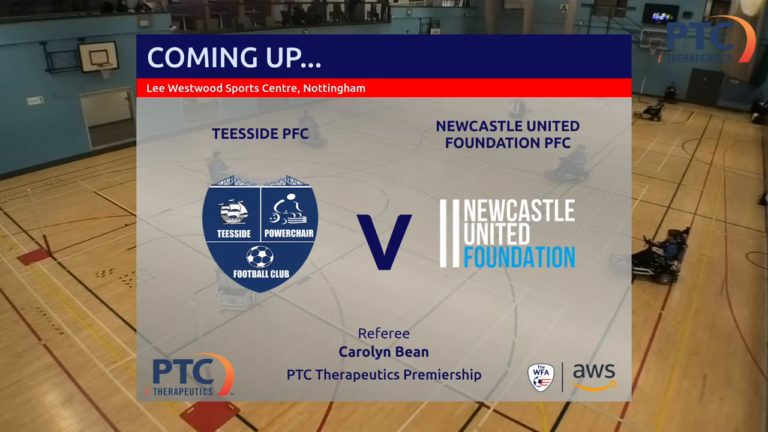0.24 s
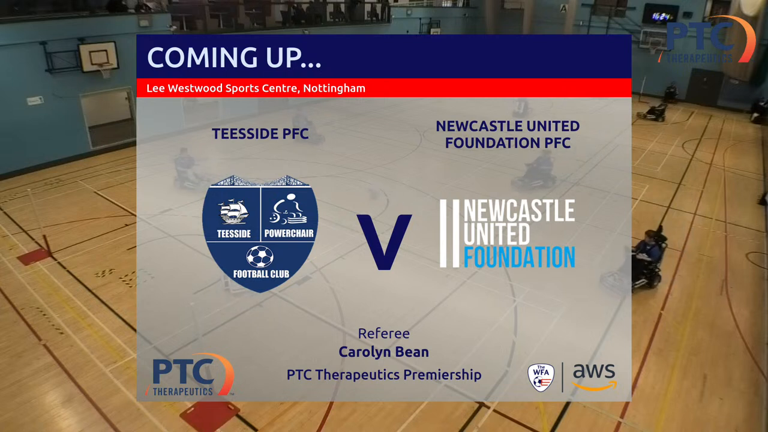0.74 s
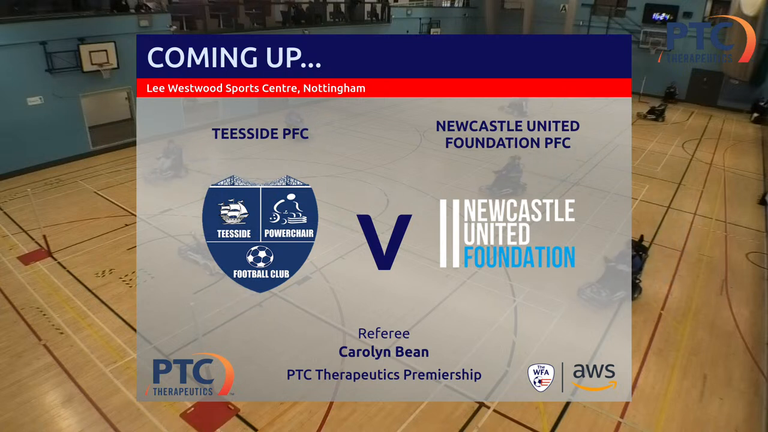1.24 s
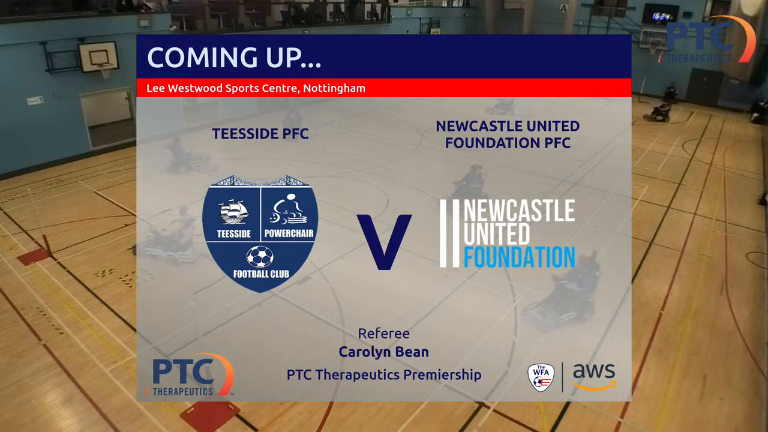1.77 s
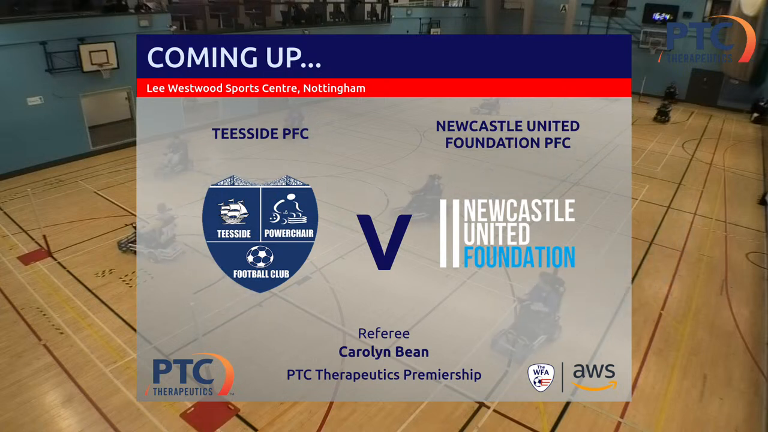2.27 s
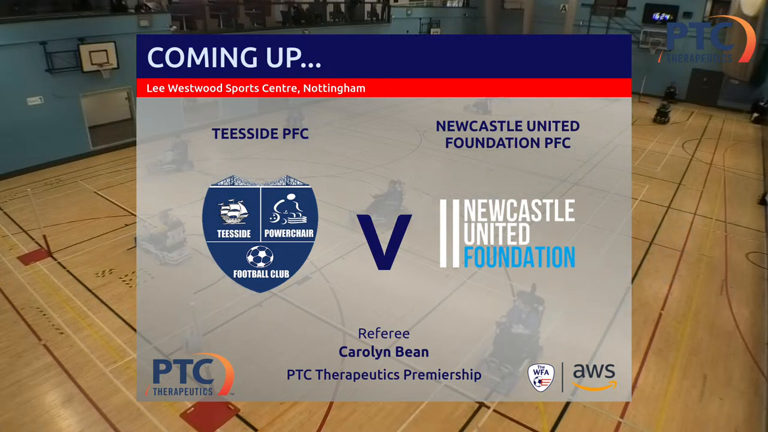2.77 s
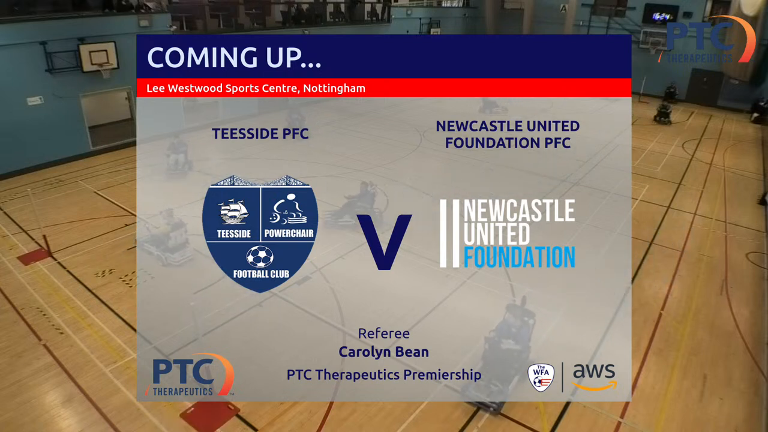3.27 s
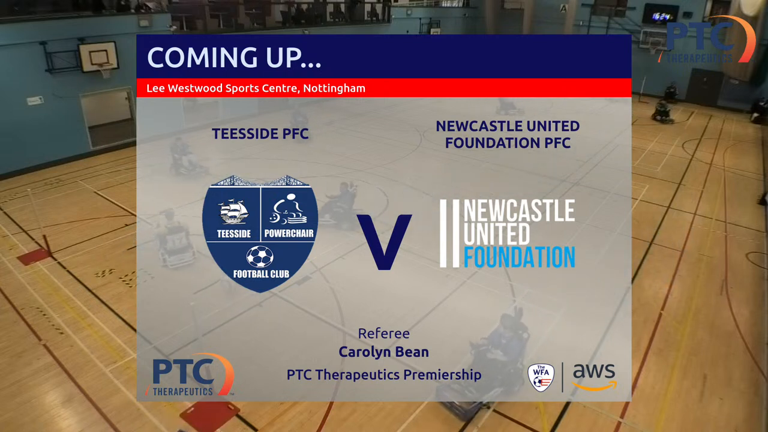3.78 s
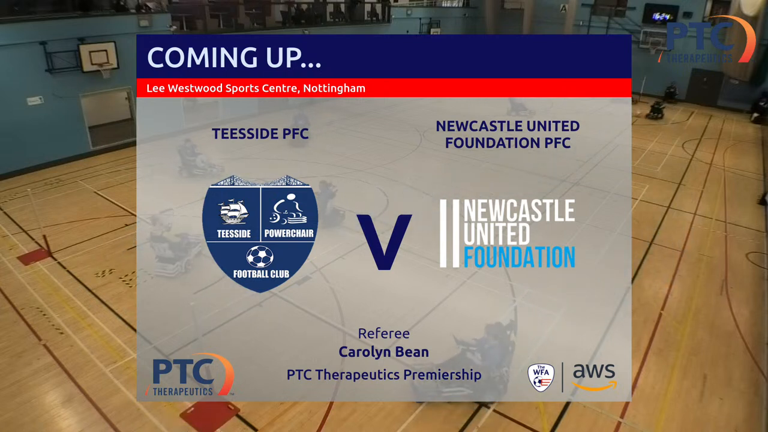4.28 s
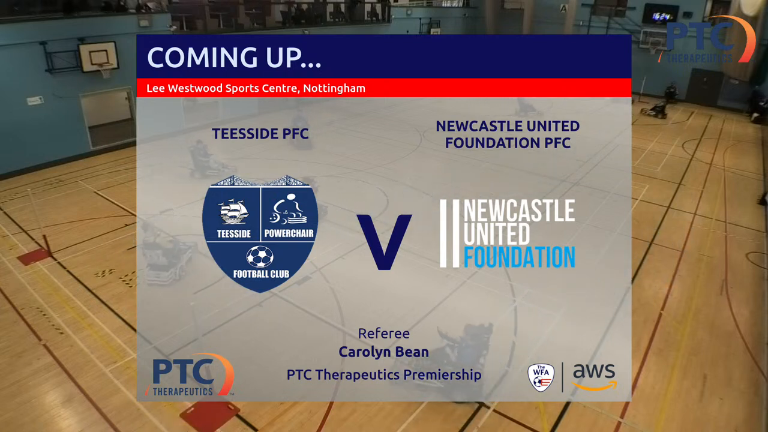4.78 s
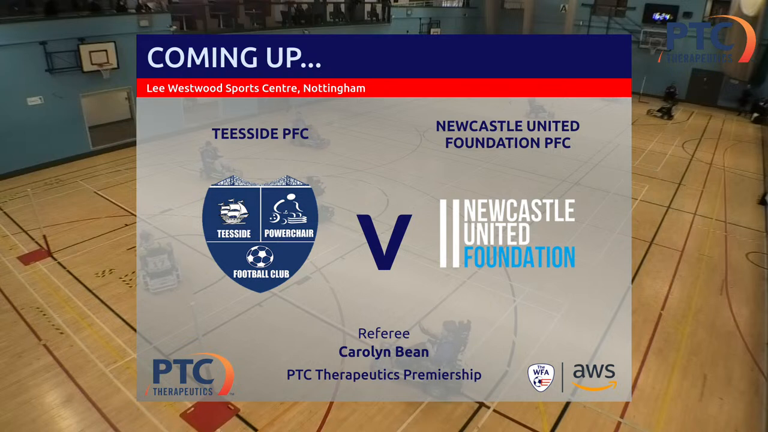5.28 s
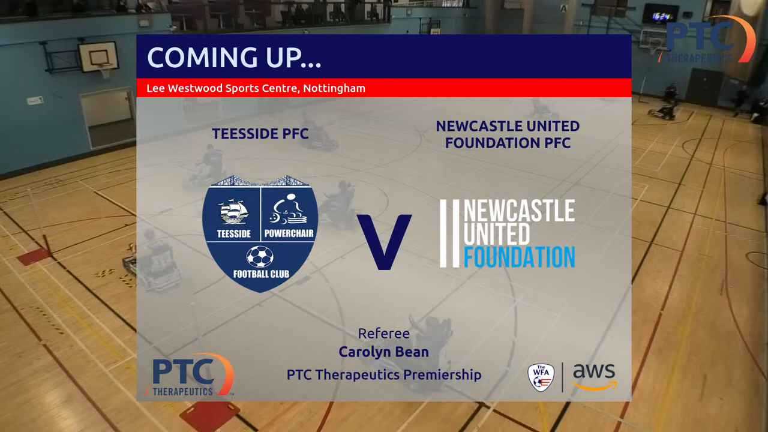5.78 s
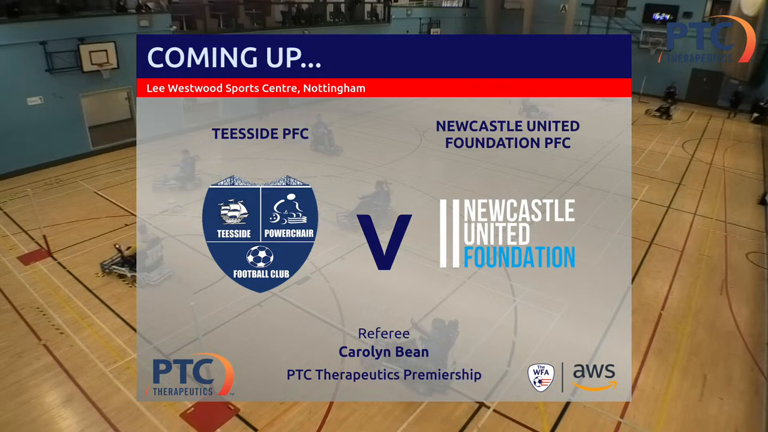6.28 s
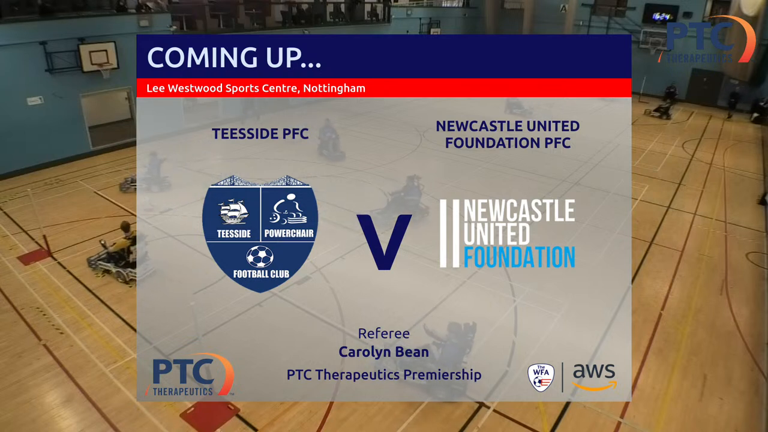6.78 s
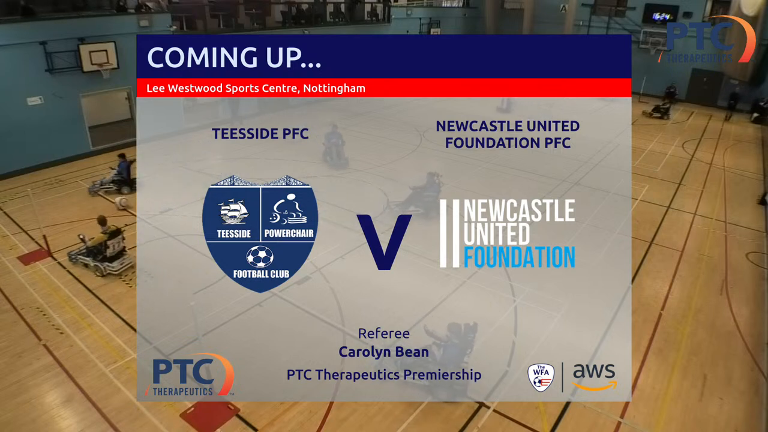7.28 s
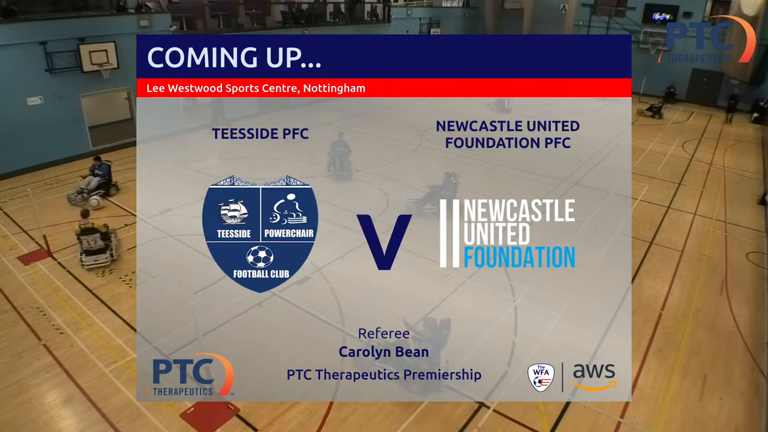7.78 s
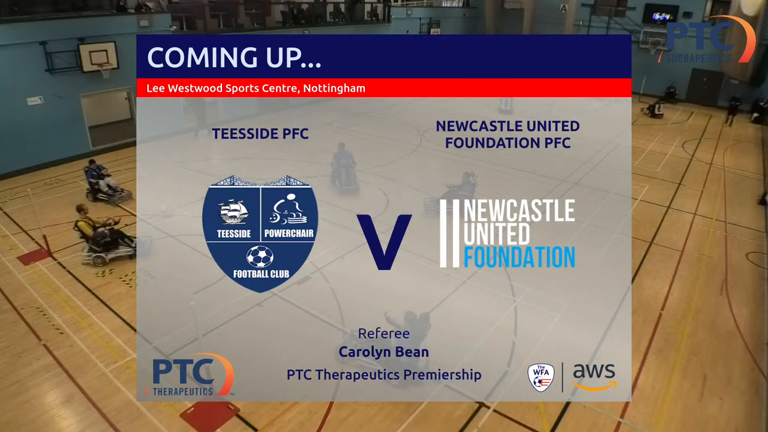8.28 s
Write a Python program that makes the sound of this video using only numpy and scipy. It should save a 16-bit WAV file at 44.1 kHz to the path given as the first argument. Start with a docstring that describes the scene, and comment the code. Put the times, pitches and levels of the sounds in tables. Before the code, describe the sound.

Electrical fault noise straight from the wire, dry and strongly left-sided, with only thin leakage on the right. Quiet open-input hiss gives way to a crackle and a steady, coarse low buzz. Just after one and a half seconds, loud clicks and a rasping high squeal cut it off. The rest is very quiet: hum, breathing hiss, tiny sputters and a wavering treble whine.

```python
"""Loose audio plug on a line input

There is no microphone. The plug's bare tip touches and lets mains buzz, fizz and thin tones into the left wire.
Contact snaps crackle, and the input stage squeals and rasps as the plug seats. Before the touch the open input
gives dull hiss, hum and a whistle; afterwards there is faint hum, hiss, sputters and a high whine that hops in pitch.
The right wire hears the left only by leakage and has its own hum and hiss."""
import sys
import numpy as np
from scipy import signal
from scipy.fft import rfft, irfft, next_fast_len
from scipy.io import wavfile
from scipy.ndimage import uniform_filter1d

SR = 44100
rng = np.random.default_rng(int(sys.argv[2]) if len(sys.argv) > 2 else 0)


def to_wav(s):
    """Save 16-bit WAV."""
    ch = np.atleast_2d(s).T  # columns
    pcm = np.round(np.clip(ch, -1, 1) * 32767)  # PCM
    wavfile.write(sys.argv[1], SR, pcm.astype(np.int16))


def boost(x):
    """Linear amplitude factor 10**(x/20) for a level x in decibels (scalar or array-like)."""
    u = np.asarray(x, float) / 20
    return 10 ** u


N = 376613
T = np.arange(N) / SR
MAINS_HZ = 49.886
OPEN_END_S, SEAT_S = .411, 1.692  # the open input ends, the seated plug begins


def curve(rows):
    """Columns of a (time_s, ..) table drawn as lines through every sample."""
    time_s, *columns = np.transpose(rows)
    return [np.interp(T, time_s, column) for column in columns]


def unit(x):
    """Scales a sound to rms 1."""
    return x / np.sqrt(np.mean(x ** 2))


def noise(points):
    """Noise of rms 1, its spectrum shaped by (pitch_hz, level_db) points on a log frequency axis."""
    pitch_hz, level_db = np.transpose(points)
    size = next_fast_len(N)
    f = np.arange(size // 2 + 1) * SR / size + 1
    gain = boost(np.interp(np.log(f), np.log(pitch_hz), level_db))
    return unit(irfft(rfft(rng.standard_normal(size)) * gain, size)[:N])


def butter(x, hz, kind, order=2):
    """Butterworth filter."""
    sections = signal.butter(order, np.clip(hz, 5, .45 * SR), kind, fs=SR, output="sos")
    return signal.sosfilt(sections, x)


def walk(rate_hz):
    """Smooth random drift of rms 1: noise low-passed at rate_hz."""
    return unit(butter(rng.standard_normal(N), rate_hz, "low"))


def wobbly(hz, spread_hz, rate_hz):
    """A sine of rms 1 whose pitch shivers at random."""
    return np.sqrt(2) * np.sin(2 * np.pi * np.cumsum(hz + spread_hz * walk(rate_hz)) / SR)


def turned(x, radians):
    """The same sound with every frequency turned forward by one phase angle."""
    return np.real(signal.hilbert(x, next_fast_len(N))[:N] * np.exp(1j * radians))


# each pulse edge is followed by a notch in the waveform, which leaves the harmonic levels alone:
# delay, share kept by the edge below and above the knee, knee as a multiple of mains
NOTCH_S, EDGE_SHARE, TREBLE_SHARE, KNEE = .00062, .8, .35, 30


def mains(rows, orders, turn, shift_hz, share=1):
    """Harmonics starting together at a sharp edge (minimum phase); coupling delays and inverts the low ones."""
    multiple, level_db = np.transpose(rows)
    cepstrum = irfft(np.interp(np.arange(1025) / 2, multiple, np.log(boost(level_db))))
    cepstrum[1:1024] *= 2  # fold onto positive time for minimum phase
    cepstrum[1025:] = 0
    edge = np.exp(rfft(cepstrum))[2 * orders]
    s = 1j * orders * MAINS_HZ / shift_hz
    coupling = (s - 1) / (s + 1)
    late = np.exp(-2j * np.pi * orders * MAINS_HZ * NOTCH_S)
    notch = (share + late) / (1 + share * late)
    lines = np.zeros(1025, complex)
    lines[orders] = edge * coupling * notch * 1024
    cycle = irfft(lines)
    return np.interp((T * MAINS_HZ - turn) % 1, np.arange(2048) / 2048, cycle, period=1)


# rectifier current pulses, one of each sign per cycle; levels are peaks at 0 dB coupling
# columns: multiple [odd, of mains], level_db [dB]
PULSE_HARMONICS = [(1, -22.5), (3, -25.9), (5, -29.5), (7, -35.5), (9, -48.0), (11, -40.4), (13, -38.3),
                   (15, -43.7), (17, -36.6), (19, -46.3), (21, -42.9), (23, -43.4), (25, -46.1),
                   (27, -48.8), (29, -61.2), (31, -52.1), (33, -52.2), (35, -54.7), (37, -56.9),
                   (39, -58.1), (41, -57.3), (43, -52.9), (45, -57.0), (47, -60.4)]
# the pulse edges carry the odd series on upward
# columns: multiple [of mains], level_db [dB peak at 0 dB coupling]
EDGE_HARMONICS = [(49, -66), (53, -57), (57, -64), (59, -54), (63, -58), (71, -54), (79, -60), (83, -57),
                  (91, -66), (95, -57), (99, -62), (107, -60), (121, -66)]
# supply ripple
# columns: multiple [even, of mains], level_db [dB peak at 0 dB coupling]
RIPPLE_HARMONICS = [(2, -32), (4, -44), (6, -57), (8, -54), (10, -72), (12, -52), (14, -66), (18, -52),
                    (20, -54), (22, -60), (24, -58), (26, -55), (28, -67), (34, -66), (36, -59), (40, -72),
                    (46, -64), (56, -63), (60, -74)]
EDGE_TURN, RIPPLE_TURN = .165, .34  # where in the mains cycle each starts
EDGE_SHIFT_HZ, RIPPLE_SHIFT_HZ = 60., 130.  # phase turn of the coupling


def buzz():
    """Mains buzz: rectifier pulses of both signs (odd harmonics) plus supply ripple (even harmonics)."""
    odd, even = np.arange(1, 122, 2), np.arange(2, 62, 2)
    share = np.where(odd < KNEE, EDGE_SHARE, TREBLE_SHARE)
    pulses = mains([*PULSE_HARMONICS, *EDGE_HARMONICS], odd, EDGE_TURN, EDGE_SHIFT_HZ, share)
    return pulses + mains(RIPPLE_HARMONICS, even, RIPPLE_TURN, RIPPLE_SHIFT_HZ)


# the bare tip touching, one row per grip
# columns: start_s [s], end_s [s], buzz_db [dB coupling], fizz_db [dB coupling], chatter [0-1 at the start]
GRIP_ROWS = [(.1022, .1095, 8, 2, .3), (.411, .445, -1.5, 0, .75), (.445, .4698, -19, -8, .5),
             (.4698, 1.607, 0, 0, 0), (1.607, 1.618, -2, 0, .4), (1.618, 1.643, -4, -9, .03),
             (1.643, 1.651, -3, 2, .9), (1.651, 1.662, -7, -11, .05), (1.662, 1.676, -5, -2, .4),
             (1.676, 1.688, -11, -5, .4)]
MAKE_S, BREAK_S, CHATTER_S = .00034, .003, .057  # coupling rises fast, lets go slower; chatter calms down


def grip():
    """Coupling gains of buzz and fizz, and the chatter, as the tip makes and loses contact."""
    gain, chatter = np.full((2, N), 1e-3), np.zeros(N)
    for start_s, end_s, buzz_db, fizz_db, shake in GRIP_ROWS:
        letting_go = np.exp(-np.clip(T - end_s, 0, None) / BREAK_S)
        made = np.clip((T - start_s) / MAKE_S, 0, 1) * letting_go
        gain = np.maximum(gain, np.outer([boost(buzz_db), boost(fizz_db)], made))
        after = T >= start_s
        chatter[after] = shake * np.exp(-(T[after] - start_s) / CHATTER_S)
    return gain[0], gain[1], chatter


# noise let in with the buzz
# columns: pitch_hz [Hz], level_db [dB per Hz, relative]
FIZZ_SPECTRUM = [(20, 0), (60, -1), (150, -4), (300, -8), (450, -12), (650, -8), (1000, -11), (1500, -16),
                 (2200, -15), (3200, -17), (5000, -17), (6400, -20), (8600, -19), (11000, -18.5),
                 (14300, -17.5)]
# thin tones while touching, each fading over its last 0.15 s
# columns: start_s [s], end_s [s], pitch_hz [Hz], level_db [dB rms at 0 dB coupling, before flutter]
TOUCH_TONES = [(0.414, 1.0, 11670, -52), (0.42, 1.05, 12000, -47), (0.795, 1.03, 12600, -66),
               (1.28, 1.65, 12300, -57), (1.396, 1.65, 12920, -58.5)]
FIZZ_DB, EDGE_FIZZ_DB = -36.5, -47  # steady fizz rms, gain of the flare at each pulse edge
# on every cycle the treble spits after the second pulse, at a random level:
# middle level, scatter, decay in mains cycles
SPIT_DB, SPIT_SCATTER_DB, SPIT_TURNS = -43, 5, .1


def touch(hum, gain, fizz_gain, chatter):
    """The bare tip lets in buzz, fizz and thin tones; a poor contact shakes the buzz at random."""
    contact = noise([(300, 7.5), (3000, -7.5), (14000, -20.0)])
    edge = np.exp(-((T * MAINS_HZ - EDGE_TURN) % .5) / .031)  # flares twice a cycle
    fizz = boost(FIZZ_DB) * noise(FIZZ_SPECTRUM)
    fizz += boost(EDGE_FIZZ_DB) * edge * butter(rng.standard_normal(N), [1500, 6000], "band")
    turn = T * MAINS_HZ - EDGE_TURN - .5
    cycle_sizes = boost(SPIT_DB + SPIT_SCATTER_DB * rng.standard_normal(N // 800))
    size = cycle_sizes[np.floor(turn).astype(int)]
    spit = np.exp(-(turn % 1) / SPIT_TURNS)
    fizz += size * spit * unit(butter(rng.standard_normal(N), [8000, 11000], "band"))
    tones = np.zeros(N)
    for start_s, end_s, pitch_hz, level_db in TOUCH_TONES:
        sounding = (T > start_s) * np.clip((end_s - T) / .15, 0, 1)
        tones += boost(level_db + 4.6 * walk(25.)) * wobbly(pitch_hz, 12., 40.) * sounding
    shaken = hum * (1 + .6 * chatter * contact)
    return gain * (shaken + .023 * chatter * contact) + fizz_gain * (fizz + tones)


# contact snaps
# columns: start_s [s], level_db [dB peak], low_hz [Hz], high_hz [Hz], spray_s [s decay]
SNAP_ROWS = [(.1059, -10, 3000, 12000, .0003), (.4112, -19, 5500, 11000, .003),
             (.4145, -15, 500, 9000, .002), (.4255, -17, 1000, 10000, .002), (.4345, -21, 1500, 8000, .002),
             (1.24, -28, 6000, 14000, .02), (1.6093, 0, 60, 5500, .0001), (1.614, -24, 1500, 14000, .003),
             (1.6435, -3, 300, 16000, .0002), (1.648, -12, 1000, 16000, .0003),
             (1.663, -12, 500, 14000, .0003), (1.6705, -14, 200, 3000, .0002),
             (2.5422, -33.5, 1500, 16000, .0025), (2.5618, -32, 1500, 16000, .001)]
# faint treble sputters of the seated plug
# columns: start_s [s], level_db [dB peak]
SPUTTER_ROWS = [(3.035, -40), (3.13, -45), (3.39, -45), (3.64, -43), (3.835, -42), (4.87, -45), (5.25, -44),
                (5.87, -45)]
SPUTTER_LOW_HZ, SPUTTER_HIGH_HZ, SPUTTER_S = 10000, 14000, .01


def snaps():
    """Contact sparks: a spike, then a spray of smaller sparks dying away; long sprays bury their spike."""
    out = np.zeros(N)
    rows = list(SNAP_ROWS)
    rows += [(s, db, SPUTTER_LOW_HZ, SPUTTER_HIGH_HZ, SPUTTER_S) for s, db in SPUTTER_ROWS]
    chance = rng.standard_normal((len(rows), 2, 2048))
    since = T[:2048]
    for (start_s, level_db, low_hz, high_hz, spray_s), (sign, size) in zip(rows, chance):
        spray = min(spray_s / .003, 1)
        sparks = spray * sign * boost(2.5 * size) * np.exp(-since / spray_s)
        sparks *= np.minimum(since / (spray * spray_s / 3), 1)
        sparks[0] = 1.2 - spray  # the spike
        sparks = butter(butter(sparks, high_hz, "low"), low_hz, "high")
        i = int(start_s * SR)
        out[i:i + 2048] += boost(level_db) * sparks / np.abs(sparks).max()
    return out


SQUEAL_HZ, RASP_HZ = 9987., 5850.
# it rasps, the tone grows, catches, sags and is cut off as the plug seats
RASP_S, CATCH_S, CUT_S, SILENT_S = 1.6625, 1.672, 1.6908, 1.713
GROW_DB_PER_S, CATCH_DB, HOLD_DB, SAG_S = 3500, -6, -12.5, .003
# rasp levels before its 3 dB trim and flutter
RASP_DB, RASP_CATCH_DB, RASP_CATCH_S, RASP_RISE_S = -17.5, -10, .002, .004
CUT_DB, CUT_DB_PER_S = -36.5, 379  # level and slope from the cut on, before the trims of tone and rasp


def squeal():
    """The input stage oscillates: an unstable tone, and a broken, rasping lower band with a bright spray."""
    since = T - CATCH_S
    cut_db = CUT_DB - CUT_DB_PER_S * (T - CUT_S)
    growing_db = CATCH_DB + GROW_DB_PER_S * since
    sagging_db = HOLD_DB + (CATCH_DB - HOLD_DB) * np.exp(-abs(since) / SAG_S)
    tone_db = np.where(since < 0, growing_db, sagging_db)
    tone_db = np.where(T < CUT_S, tone_db, cut_db - 1)
    rasp_db = RASP_DB + (RASP_CATCH_DB - RASP_DB) * np.exp(-abs(since) / RASP_CATCH_S)
    rasp_db = np.where(T < CUT_S, rasp_db, cut_db)
    tone = wobbly(SQUEAL_HZ, 60., 300.) * boost(1.4 * walk(900.))
    rasp = unit(butter(rng.standard_normal(N), [RASP_HZ - 700, RASP_HZ + 700], "band", order=3))
    spray = noise([(1500, -19), (4000, -11), (7000, -4), (9000, -3.5), (12000, -2), (14300, -8)])
    broken = boost(rasp_db - 3 + 3 * walk(250.)) * np.clip((T - RASP_S) / RASP_RISE_S, .3, 1)
    sounding = (T > RASP_S) * (T < SILENT_S)
    return sounding * np.array([boost(tone_db) * tone, broken * (rasp + 1.2 * spray)])


# resting pitches of the whine's two tones: at rest, spread apart, raised
# columns: upper_hz [Hz], lower_hz [Hz]
WHINE_STATES = [(13320, 13235), (13630, 12170), (13510, 13425)]
# the whine leaves its rest
# columns: start_s [s], end_s [s], state [row of the table above, from 0]
WHINE_HOPS = [(1.69, 2.545, 1), (3.07, 3.128, 1), (3.218, 3.45, 1), (3.45, 3.63, 2), (3.63, 3.687, 1),
              (3.687, 3.73, 2), (3.73, 3.906, 1), (4.395, 4.425, 1), (4.684, 4.749, 1), (4.884, 5.148, 1),
              (5.25, 5.3, 1), (5.83, 5.87, 2)]
# the whine settles after seating
# columns: time_s [s], offset_hz [Hz above the resting pitch]
WHINE_SETTLING = [(1.7, 550), (1.74, 750), (1.8, 600), (1.85, 620), (1.89, 800), (1.95, 250), (2.05, 50),
                  (2.2, 0)]
# the pitch shivers more and sits higher on a stronger line, and shivers most around hops
SHIVER_HZ, SHIVER_DB_PER_DB, HOP_SHIVER_HZ, RESTLESS_S, PITCH_HZ_PER_DB = 32, 2, 22.1, .3, 7.5
BEAT_CARRIERS_HZ = (14825., 15725.)
BEAT_DB, SPREAD_BEAT_DB = -15.5, -3.5  # the beats are fainter while the tones are apart


def whine(line_db):
    """Two shivering tones; the lower one beats against two unheard carriers and leaves faint low tones."""
    state = np.zeros(N, int)
    for start_s, end_s, k in WHINE_HOPS:
        state[(T >= start_s) & (T < end_s)] = k
    span = int(RESTLESS_S * SR)
    hops_near = uniform_filter1d(1. * (np.diff(state, prepend=0) != 0), span) * span
    shiver_hz = SHIVER_HZ * boost(SHIVER_DB_PER_DB * line_db) + HOP_SHIVER_HZ * np.clip(hops_near, 0, 2)
    drift_hz = curve(WHINE_SETTLING)[0] + PITCH_HZ_PER_DB * line_db + shiver_hz * walk(120.)
    upper_hz, lower_hz = np.transpose(WHINE_STATES)[:, state] + drift_hz
    upper = boost(-2. + 2.28 * walk(40.)) * wobbly(upper_hz, 8., 30.)
    lower = boost(-3. + 2. * walk(40.)) * wobbly(lower_hz, 8., 30.)
    beats = sum(wobbly(hz - lower_hz, 6.1, 30.) for hz in BEAT_CARRIERS_HZ)
    beat_db = BEAT_DB + np.where(state == 1, SPREAD_BEAT_DB, 0)
    return upper + lower, boost(beat_db) * beats


# one line level for hum, hiss and whine of the seated plug
# columns: time_s [s], level_db [dB, relative]
SEATED_LEVEL = [(1.72, 2), (1.74, -3), (1.93, 1), (2.0, -4.5), (2.16, -3.5), (2.31, -1.5), (2.8, 0),
                (6.7, -0.5), (6.83, -2.5), (8.54, -3)]


def seated_level():
    """Line level in dB that hum, hiss and whine share once the plug sits."""
    return curve(SEATED_LEVEL)[0]


# hiss of the seated plug
# columns: pitch_hz [Hz], level_db [dB, relative]
HISS_SPECTRUM = [(18, -28.5), (30, 0), (152, -7.5), (197, -10.5), (249, -13), (487, -21.5), (837, -21.5),
                 (1910, -22.5), (7700, -23.5), (13200, -14.5), (14300, -20)]
HUM_DB, HUM_CUT_HZ, HISS_DB = -29, 130, -54  # gains at 0 dB line level


def seated_noise(hum, line_db):
    """Faint hum, the mains buzz thinned by a gentle high-pass, and slowly breathing hiss."""
    faint = boost(line_db + HUM_DB) * butter(hum, HUM_CUT_HZ, "high", order=1)
    hiss = boost(line_db + HISS_DB) * noise(HISS_SPECTRUM) * boost(.8 * walk(2.7))
    return faint + hiss


# dull hiss of the open input
# columns: pitch_hz [Hz], level_db [dB, relative]
OPEN_SPECTRUM = [(76, -21), (130, 2), (225, -9), (303, -5), (615, -2), (842, -8), (911, -3.5), (1490, -10),
                 (3680, -8), (6380, -10), (14300, -43)]
# thin whistle on the open input
# columns: time_s [s], level_db [dB rms]
WHISTLE_LEVEL = [(0, -62), (.05, -52), (.12, -49), (.22, -52.5), (.3, -68), (.41, -52)]
OPEN_DB, OPEN_HUM_DB, WHISTLE_HZ = -48, -45, 3860  # both levels rms


def open_input():
    """The unconnected input before the touch: dull hiss, round hum and a thin, shivering whistle."""
    hum = np.sqrt(2) * np.sin(2 * np.pi * (MAINS_HZ * T + .35))
    whistle = boost(curve(WHISTLE_LEVEL)[0]) * wobbly(WHISTLE_HZ, 195., 204.)
    return (T < OPEN_END_S) * (boost(OPEN_DB) * noise(OPEN_SPECTRUM) + boost(OPEN_HUM_DB) * hum + whistle)


def right_wire(left, sparks, high, tone, rasp, line_db, touching):
    """Stray capacitance leaks the left wire in, treble first, over the right wire's own hum and hiss."""
    leak = boost(-37) * turned(left, 1.5)
    leak += boost(-12) * butter(sparks, 4000., "high")
    leak += boost(-11.5) * turned(high, 1.)
    leak += boost(-12) * turned(tone, 1.)
    leak += boost(-9) * turned(butter(rasp, 3000., "high"), .8)
    own_hum = (boost(-66.) + boost(-54.) * touching) * np.sin(2 * np.pi * (MAINS_HZ * T + .53))
    own_hiss = noise([(30, 9.0), (150, 3.5), (350, -15.0), (1000, -14.0), (5000, -9.5),
                      (9000, -5.5), (12000, 5.5), (14300, 1.5)])
    own_level = (T > SEAT_S) * boost(line_db - 67) + boost(-67) * (T < OPEN_END_S) + boost(-55.) * touching
    return leak + own_hum + own_level * own_hiss


WHINE_DB = -59  # gain of whine and beats at 0 dB line level


def scene():
    """Left carries the loose plug; right gets it by leakage."""
    hum = buzz()
    line_db = seated_level()
    touching, fizz_gain, chatter = grip()
    seated = T > SEAT_S
    whine_gain = seated * boost(line_db + WHINE_DB)
    high, beats = whine(line_db)
    high = whine_gain * high
    sparks = snaps()
    tone, rasp = squeal()
    left = touch(hum, touching, fizz_gain, chatter) + open_input() + sparks
    left += seated * seated_noise(hum, line_db) + whine_gain * beats
    right = right_wire(left, sparks, high, tone, rasp, line_db, touching)
    return np.array([left + high + tone + rasp, right])


LINE_TOP_HZ = 14290.


def low_pass(x):
    """Removes everything above the highest recorded frequency."""
    return signal.sosfilt(signal.butter(12, 16570, fs=SR, output="sos"), x)


def record(dry):
    """Coupling capacitors block DC, the band ends sharply, the converter clips."""
    size = next_fast_len(N)
    passed = np.arange(size // 2 + 1) * SR / size < LINE_TOP_HZ
    line = irfft(rfft(butter(dry, 25., "high"), size) * passed, size)[:, :N]
    return low_pass(np.clip(line, -1, 1))


dry = scene()
out = record(dry)
to_wav(out)
```